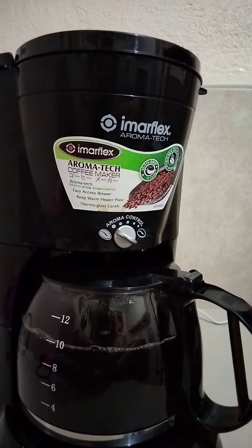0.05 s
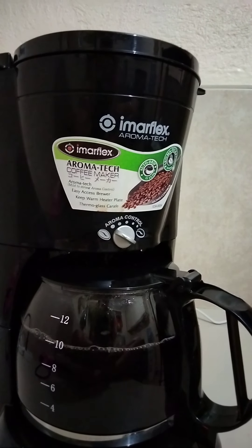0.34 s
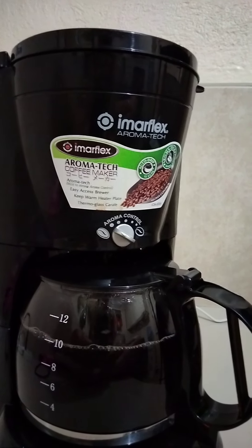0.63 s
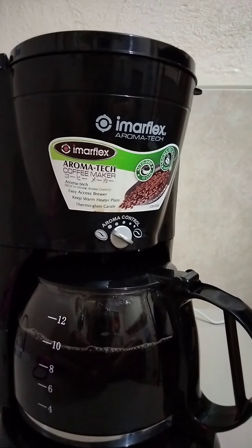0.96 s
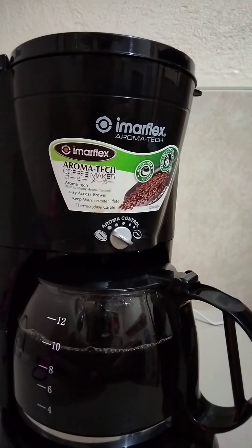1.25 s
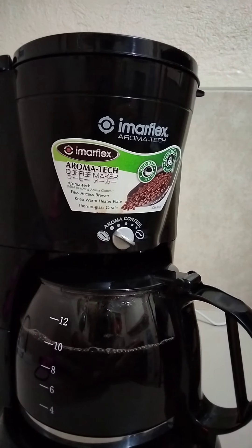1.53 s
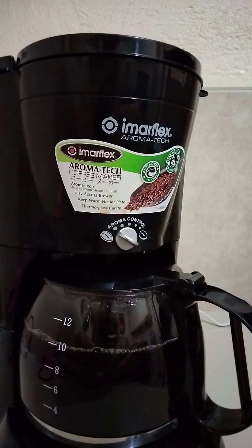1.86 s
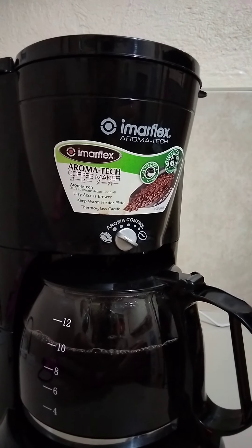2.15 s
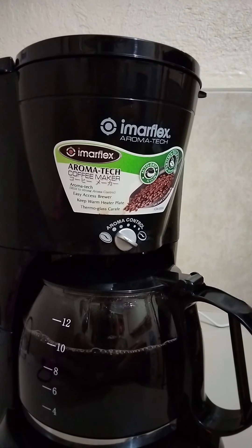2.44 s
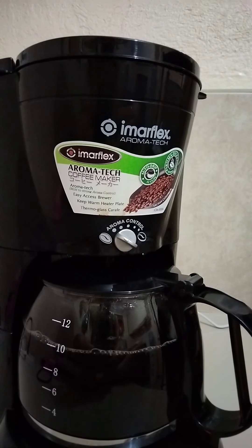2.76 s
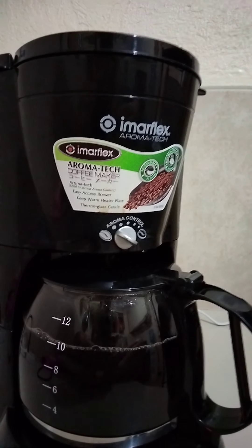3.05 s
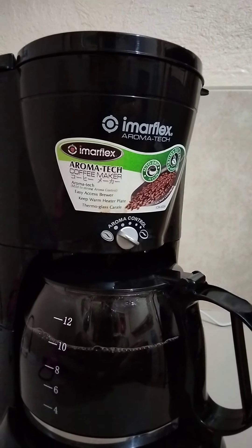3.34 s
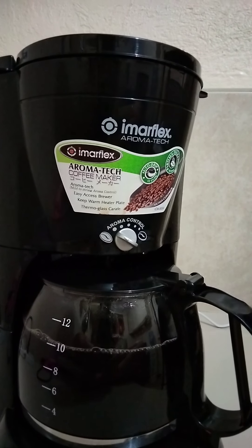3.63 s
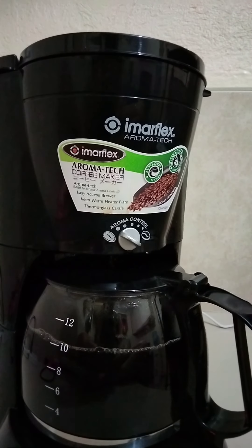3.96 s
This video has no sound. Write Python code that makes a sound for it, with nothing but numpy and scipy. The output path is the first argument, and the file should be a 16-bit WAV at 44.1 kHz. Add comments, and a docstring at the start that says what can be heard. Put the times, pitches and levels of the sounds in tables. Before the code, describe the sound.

A drip coffee maker gurgles close by for the whole four seconds, with quick, uneven, hollow pops and small spits of spray. The bubbling is densest in the first second, eases around 1.4 seconds, then picks up again. Faint steam sighs come and go. Brief soft sizzles come near 2.3 seconds and after 3.3, with a soft low bump and tiny ticks from 3 seconds. A faint hum lies beneath.

```python
"""Gurgling drip coffee maker

Steam bubbles burst in the hot-water tube of a coffee maker, close by in a small, hard-walled room.
Each pop is a pressure impulse that excites the resonances of the plastic housing, reflects from the
wall behind and spits a little spray. Small bubbles simmer between the pops, steam sighs through the
outlet and water sizzles on hot metal. A faint hum lies beneath; a low bump and a few ticks come late."""
import sys
import numpy as np
from scipy import signal
from scipy.fft import rfft, irfft
from scipy.io import wavfile

SR = 44100
rng = np.random.default_rng(int(sys.argv[2]) if len(sys.argv) > 2 else 0)


def unload_audio(sound):
    """Save the sound as a 16-bit wav file, at the path given as the first command line argument."""
    columns = np.transpose(np.atleast_2d(sound))
    # keep every value between -1 and 1, then stretch to whole-number steps
    steps = np.round(np.clip(columns, -1, 1) * 32767)
    wavfile.write(sys.argv[1], SR, steps.astype(np.int16))


N = 176400

# bursting bubbles against a typical pop: t/s, gulp/dB, ring/dB, snap/dB, spray/dB
POPS = [(0.0002, -6.5, 1.5, -3, 4), (0.018, -4.5, 1, -7.5, -1), (0.0853, -4.5, -21, -30.5, -11),
        (0.1197, 1, 14, -21.5, 0.5), (0.128, 0, 10.5, 6, 11.5), (0.159, -1, 0, -4, -1),
        (0.1721, -10, 11, -7, 8), (0.2015, 2, 8.5, 2, 13), (0.2284, 0.5, 9.5, -3, -7),
        (0.2546, -1, 10, -3, 2.5), (0.2897, -4.5, 10, 6.5, 14), (0.301, 7, -17, 5, 11.5),
        (0.3335, -15, 13, -10.5, -6), (0.3546, 0.5, 14.5, 2.5, 7.5), (0.364, -28.5, 13.5, 4.5, 1),
        (0.373, 6, 4, 6, 11), (0.4363, 1.5, 14.5, 5, 9), (0.5383, -1, 4, -5.5, -22),
        (0.5709, -12, 13, -13, 6.5), (0.578, -3.5, 12.5, -18, 5), (0.6508, -0.5, 13.5, -0.5, 9),
        (0.674, -4.5, -12.5, -19, -9), (0.721, 2.5, 15, 4.5, 2.5), (0.7568, -19, 10, -24, -6.5),
        (0.7926, -1, 7.5, 0, 7), (0.8141, -2, 3.5, -2, 2), (0.8247, 3, 3, 8, 13),
        (0.8395, 0.5, 13, -3.5, 13.5), (0.857, 1, 14, 7, 10.5), (0.8969, -0.5, 2, 1.5, 5),
        (0.91, 0.5, 10, 0.5, 5), (0.922, 3.5, 6, 2, 14), (0.9365, -4, 8, -15, -5.5),
        (0.9801, 2, 11.5, 11.5, 18.5), (0.994, -7, 11.5, -7, -5.5), (1.017, 0, 14.5, 7, 18.5),
        (1.04, -0.5, -4.5, -3, -3), (1.0843, -3, 7.5, -1, 4.5), (1.1413, -6.5, 1, -7, 1),
        (1.1976, -7, 7, 2.5, 1.5), (1.207, 2, -30, 2, -1), (1.2721, 0.5, 17.5, 3.5, 6),
        (1.312, -2, -7, -26, -20.5), (1.4087, -2.5, 1.5, -27, -15), (1.4736, -2.5, 11.5, -3, 5),
        (1.5605, -8, 1.5, -11, -5), (1.5862, 1, 0, -25, 1), (1.608, -12, 7, -4, 5), (1.62, 2, 2, 0.5, -3),
        (1.6702, 4.5, 5, -1.5, 7.5), (1.698, 0, 5.5, 2.5, 6.5), (1.7364, -12, -4, -6, 1),
        (1.7653, 0.5, 10.5, 3, 7), (1.8042, 0.5, 7, -1.5, 5.5), (1.8585, -0.5, 2.5, -3, -1),
        (1.9626, 2, 8.5, 5, -11), (2.0625, -2, 1.5, -3, 4), (2.0782, -0.5, -12, -1, -13),
        (2.1075, 5.5, 4, 4.5, 7), (2.141, 2.5, 3.5, -4, -10), (2.2124, 5, 2.5, -15.5, 10),
        (2.2255, 7, 5.5, 6.5, 7.5), (2.255, -3, -1.5, -0.5, -19), (2.3295, 4.5, 11, 13, 15),
        (2.377, 1.5, 4, 2.5, -3), (2.4562, 7, 4, 7, 13.5), (2.465, 4, 6, 8.5, 13), (2.504, -2.5, -6, 0, 4),
        (2.5258, 8, 8, 8.5, 2), (2.5831, 3, -8, -34, -1.5), (2.6017, -7, 0.5, 3, -3),
        (2.63, -8.5, -2, -6, -5), (2.73, -3, 3, 0, 6), (2.8188, 3.5, 1.5, 2.5, 3),
        (2.8438, 1.5, -5, -2, -1), (2.8876, 6.5, 8, 10, 5), (2.914, -10, -2, -10, -12),
        (2.973, -0.5, 13.5, -7, 13.5), (2.984, 3, -7, 9.5, 7.5), (3.008, -5, -7, -17, -5),
        (3.035, -3, -13, -6, -3), (3.099, -8.5, 2.5, -2, 1), (3.1093, 1, -10, -1.5, 3),
        (3.193, 3, -2, 10, 7.5), (3.2036, 0.5, 11, 6.5, 13.5), (3.2613, 5, 8, 8, 16),
        (3.3466, 1.5, -9, -24, -29), (3.3622, 2.5, 6.5, 6.5, 6.5), (3.3767, 3, 8, 6.5, 5),
        (3.3906, 1.5, 9.5, 11.5, 13.5), (3.4338, 6, 9, 9, 10.5), (3.443, -4, -2, 3.5, 4),
        (3.524, -1.5, 5, 5, 5), (3.5409, -3, -4, -28, -2), (3.6439, -4, 3.5, 1.5, 5),
        (3.6613, 2.5, 6, 3.5, 11.5), (3.7129, 4, 11, 9, 5), (3.8353, 4, 3, -1, 10.5),
        (3.859, 0.5, 2.5, 0.5, -1), (3.887, -4.5, 3, 1.5, 15), (3.986, -16, -11, -16, 4.5)]
# centres of a pop's thump, boom, gulp, ring and snap bands: f/Hz
POP_BANDS = [160, 340, 550, 901, 1480]
# the two lowest bands relative to the gulp: t/s, thump/dB, boom/dB
LOW_BANDS = [(.3, 1.5, -1), (1.7, 0, 0.5), (2.25, -5.5, -5.5), (2.549, -9.5, -2), (3.7, -2, -4)]
# spectral envelope of a typical pop: f/Hz, level/dB
POP_SPECTRUM = [(40, -45), (100, -28.5), (135, -4), (170, -1.5), (300, 2), (432, -11.5), (500, -3),
                (660, -17), (1040, -12), (1190, -19), (1290, -9.5), (1800, -12.5), (2050, -23),
                (3200, -31.5), (6000, -68)]
# cavity resonances of the housing: f/Hz, bandwidth/Hz, lift/dB
CAVITIES = [(363, 66, 13), (566.4, 80.5, 21), (876.4, 65, 23), (965, 12, 15)]
# round trips inside tube and lid: delay/s, reflection coefficient
ROUND_TRIPS = [(.00225, 0.7), (0.00025, 0.54)]
# long-ringing modes of machine and room: f/Hz, level/dB, T60/s
MODES = [(139.5, -8.5, 0.45), (203.2, -14.5, 0.17), (357.1, -17, 0.41), (563, -17, 0.16), (767, -13.5, 0.2),
         (849, -20.5, 0.44), (950, -14.5, 0.26), (1146, -15, 0.72), (1378, -14, 0.46), (1775, -10.5, 0.39)]
# spectrum that the machine radiates into the room: f/Hz, level/dB
RADIATED_SPECTRUM = [(40, -47.5), (100, -21), (140, -4.5), (370, 2.5), (440, -5), (560, 3), (680, -12),
                     (900, -2.5), (1020, 0.5), (1170, -12), (1800, -17), (2100, -28), (6000, -56.5)]
# reverberation time of the room: f/Hz, T60/s
ROOM_T60 = [(120, 0.21), (350, 0.3), (900, 0.31), (2000, 0.23), (5000, 0.57), (9000, 0.078)]
# relative strength of the simmer: t/s, level/dB
SIMMER_LEVELS = [(0, -18.5), (.3, -12), (.5, -20.5), (.9, -8.5), (1.349, -26), (1.701, -7.5), (1.92, -29),
                 (2.4, -23), (2.75, -27), (3.4, -21.5), (3.6, -32)]
# spectrum of a small bubble: f/Hz, level/dB
SIMMER_SPECTRUM = [(350, -3.5), (600, -14.5), (930, 2.5), (1300, -9.5)]
# spectrum of the spray: f/Hz, level/dB
SPRAY_SPECTRUM = [(1200, -12), (2600, -8), (3150, 4.5), (3750, 0.5), (4350, -10.5), (5000, -11.5),
                  (5500, -19), (6200, -34), (8300, -27), (10500, -49), (15000, -56.5)]
# relative spectral density of the room noise: f/Hz, level/dB
FLOOR_SPECTRUM = [(20, -22), (38, -6.5), (85, -5), (140, 2), (500, 4.5), (1000, -12), (1500, -4.5),
                  (1900, -14), (2300, -3), (2900, -13), (3300, -30.5), (3480, -7.5), (3900, -23.5),
                  (4800, -24.5), (6200, -36.5), (6850, -28), (7600, -34), (8200, -29), (9500, -33),
                  (11200, -40.5), (15700, -40.5)]
# tones of the hum: f/Hz, rms level/dB
HUM_TONES = [(2128, -60.5), (3419, -61.5)]
# sighs of steam: t/s, decay time/s, level/dB
SIGHS = [(0.126, 0.075, -56), (.29, 0.083, -63.5), (0.438, 0.022, -55), (.72, 0.022, -58),
         (0.831, 0.19, -61), (0.978, 0.032, -47.5), (1.474, 0.14, -64), (1.70, 0.08, -64),
         (2.459, 0.035, -59), (3.205, 0.11, -67), (3.711, 0.031, -60), (3.89, 0.026, -51.5)]
# resonances of the steam outlet: f/Hz, half-width/Hz, level/dB
OUTLET_RESONANCES = [(3300, 600, -12), (4700, 70, -1), (4930, 150, 5), (8150, 140, 0)]
# sizzles on hot metal: t/s, duration/s, level/dB
SIZZLES = [(2.291, 0.22, -59.5), (3.36, 0.16, -55.5), (3.628, 0.12, -51.5), (3.813, 0.16, -48)]
# spectrum of a sizzle: f/Hz, level/dB
SIZZLE_SPECTRUM = [(1000, -24), (2000, 7.5), (3900, 0), (4650, 0), (5600, -37), (9000, -20.5), (15000, -48)]
# dry ticks: t/s, level/dB
TICKS = [(3.0135, -36), (3.197, -45), (3.8915, -46), (3.895, -42)]

WALL_DELAY_S, WALL_GAIN = 0.005393, 0.31
FREQS = np.fft.rfftfreq(4096, 1 / SR)  # f/Hz, the grid for short spectra


def amp(db):
    """Amplitude ratio of a level in decibels."""
    return 10 ** (np.asarray(db) / 20)


def unit_rms(x):
    """Normalisation to a mean square of 1."""
    return x / np.sqrt(np.mean(x ** 2) + 1e-20)


def unit_energy(x):
    """Normalisation to a sum of squares of 1."""
    return x / (np.linalg.norm(x) + 1e-12)


def curve_at(points, hz):
    """Interpolation on a logarithmic frequency axis."""
    f, value = np.transpose(points)
    return np.interp(np.log(hz + 1), np.log(f + 1), value)


def add(mix, s, sound):
    """Superposition of a sound on the mix, starting at s seconds."""
    part = mix[max(round(s * SR), 0):][:len(sound)]
    part += sound[:len(part)]


def minimum_phase(db):
    """The most compact causal impulse with a given spectrum, by folding the cepstrum."""
    cepstrum = irfft(np.log(amp(db)))
    half = len(cepstrum) // 2
    cepstrum[1:half] *= 2
    cepstrum[half + 1:] = 0
    return irfft(np.exp(rfft(cepstrum)))


def convolve(x, response):
    """Linear filtering by an impulse response, cut to the input's length."""
    return signal.fftconvolve(x, response)[:len(x)]


def noise(spectrum):
    """Gaussian noise of rms 1, shaped by rows of f/Hz, level/dB."""
    gain = amp(curve_at(spectrum, np.fft.rfftfreq(N, 1 / SR)))
    return unit_rms(irfft(rfft(rng.standard_normal(N)) * gain, N))


def puff(rise_s, decay_s):
    """Envelope of exponential rise and decay."""
    t = np.arange(SR // 2) / SR
    return (1 - np.exp(-t / rise_s)) * np.exp(-t / decay_s)


def pops():
    """Impulsive excitation: each bursting bubble gives one pressure click with its own spectrum."""
    out = np.zeros(N)
    times, *low_curves = np.transpose(LOW_BANDS)
    for s, gulp_db, ring_db, snap_db, _ in POPS:
        low_db = [gulp_db + np.interp(s, times, curve) for curve in low_curves]
        spectrum = list(zip(POP_BANDS, [*low_db, gulp_db, ring_db, snap_db]))
        add(out, s, minimum_phase(curve_at(spectrum, FREQS)))
    return out


def simmer(bubbles_per_s=260, spread_db=4):
    """A Poisson process: many small bubbles click at independent random moments."""
    onsets = rng.random(N) < bubbles_per_s / SR
    clicks = onsets * amp(spread_db * np.clip(rng.standard_normal(N), -2, 2))
    envelope = amp(-18.5 + np.interp(np.arange(N) / SR, *np.transpose(SIMMER_LEVELS)))
    return convolve(unit_rms(clicks) * envelope, minimum_phase(curve_at(SIMMER_SPECTRUM, FREQS)))


def tube_reflections(click):
    """All-pass dispersion: round trips in tube and lid spread a click in time but keep its colour."""
    spectrum, hz = rfft(click), np.fft.rfftfreq(len(click), 1 / SR)
    for s, reflection in ROUND_TRIPS:
        delay = np.exp(-2j * np.pi * hz * s)
        spectrum = spectrum * (reflection + delay) / (1 + reflection * delay)
    return irfft(spectrum)


def slosh(x, rate_hz=9, pitch_depth=0.022):
    """Frequency modulation: moving water changes the cavities, so each pop glides a little in pitch."""
    bend = noise([(0, -60), (rate_hz / 2, 0), (rate_hz * 2, 0), (rate_hz * 6, -60), (rate_hz * 20, -160)])
    # leaky integration turns the pitch bend into a time shift
    lead_samples = signal.lfilter([pitch_depth], [1, -np.exp(-np.pi * rate_hz / SR)], bend)
    return np.interp(np.arange(N) + lead_samples, np.arange(N), x)


def housing(bubbles):
    """Resonance: cavities colour the clicks, the wall reflects them, and modes and room ring on."""
    power_lift = 1 + sum(amp(db) ** 2 / (1 + (2 * (FREQS - f) / width) ** 2) for f, width, db in CAVITIES)
    direct = tube_reflections(minimum_phase(curve_at(POP_SPECTRUM, FREQS) + 10 * np.log10(power_lift)))
    response = direct.copy()
    add(response, WALL_DELAY_S, WALL_GAIN * direct)
    near = slosh(convolve(bubbles, unit_energy(response)))
    t = np.arange(SR // 2) / SR
    ring = sum(amp(db - 60 * t / t60) * np.cos(2 * np.pi * f * t) for f, db, t60 in MODES)
    radiated = convolve(bubbles, unit_energy(minimum_phase(curve_at(RADIATED_SPECTRUM, FREQS))))
    return near + amp(-42) * convolve(near, ring) + amp(-8) * reverberation(radiated)


def spray():
    """Incoherent addition: the noisy spit of each pop and its wall reflection sum in power."""
    power = np.zeros(N)
    for s, *_, spray_db in POPS:
        spit = amp(spray_db - 45.5) * puff(rise_s=0.001, decay_s=0.0044)
        add(power, s, spit ** 2)
        add(power, s + WALL_DELAY_S, (WALL_GAIN * spit) ** 2)
    return np.sqrt(power) * noise(SPRAY_SPECTRUM)


def background(waver_hz=3.35):
    """Stationary room noise and a thin hum whose tones waver by random frequency modulation."""
    out = amp(-46) * noise(FLOOR_SPECTRUM)
    for hz, db in HUM_TONES:
        waver = noise([(0, 0), (15, 0), (80, -60), (300, -140)])
        phase = 2 * np.pi * np.cumsum(hz + waver_hz * waver) / SR
        out += amp(db) * np.sqrt(2) * np.sin(phase)
    return out


def reverberation(x, tails=3, delay_s=0.007):
    """A diffuse field: random reflections die away, each band at its own rate."""
    out = np.zeros(N)
    turn = 2 * np.pi * np.arange(N) / SR
    for k in range(tails):
        reflections = rng.standard_normal(SR // 2) * (rng.random(SR // 2) < 0.1)
        hz, t, bands = signal.stft(reflections, SR, nperseg=256)
        decay = amp(-60 * t / curve_at(ROOM_T60, hz)[:, None])
        _, tail = signal.istft(bands * decay, SR, nperseg=256)
        share = np.cos(turn + np.pi * k / tails) * np.sqrt(2 / tails)  # tails take turns at equal power
        add(out, delay_s, convolve(x * share, unit_energy(tail)))
    return out


def steam_sighs():
    """Source and filter: the noise of each puff of steam is shaped by the outlet's resonances."""
    envelope = np.zeros(N)
    for s, decay_s, db in SIGHS:
        add(envelope, s, amp(db) * puff(0.00067, decay_s))
    outlet = sum(amp(db) / (1 + ((FREQS - f) / width) ** 2) for f, width, db in OUTLET_RESONANCES)
    return envelope * noise(np.c_[FREQS, 20 * np.log10(outlet)])


def sizzles():
    """Rapid boiling: water on hot metal gives short bursts of broadband noise."""
    envelope = np.zeros(N)
    for s, duration_s, db in SIZZLES:
        add(envelope, s, amp(db) * signal.windows.tukey(round(duration_s * SR)))
    return envelope * noise(SIZZLE_SPECTRUM)


def bump(start_s=3.008, hz=62):
    """A heavily damped oscillation, heard as one soft, low bump."""
    out, envelope = np.zeros(N), puff(rise_s=0.003, decay_s=0.005)
    t = np.arange(len(envelope)) / SR
    add(out, start_s, amp(-33) * envelope * np.sin(2 * np.pi * hz * t))
    return out


def ticks():
    """Ideal impulses with flat spectra, heard as tiny dry snaps."""
    out = np.zeros(N)
    for s, db in TICKS:
        add(out, s, amp([db]))
    return out


def scene():
    """Superposition in one channel: bubbles in the housing, hiss in the room, and the quieter sounds."""
    hiss = spray() + steam_sighs() + sizzles()
    gurgle = housing(pops() + simmer())
    return (gurgle + hiss + amp(-12) * reverberation(hiss) + background() + bump() + ticks())[None]


def record(dry, cutoff_hz=15750):
    """Band limiting: a linear-phase low-pass filter removes the highest treble."""
    lowpass = signal.firwin(801, cutoff_hz, window=("kaiser", 9), fs=SR)
    return signal.oaconvolve(dry, lowpass[None], "same")


dry = scene()
out = record(dry)
unload_audio(out)
```